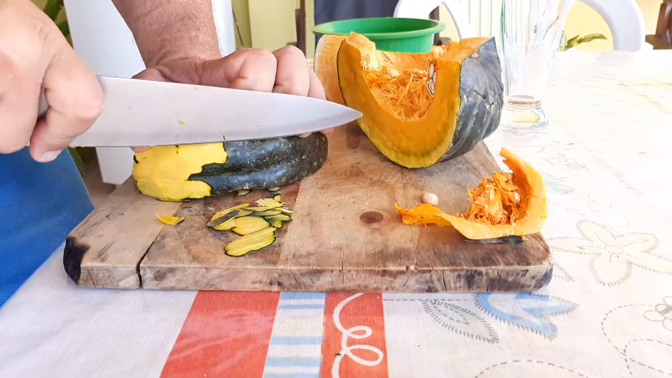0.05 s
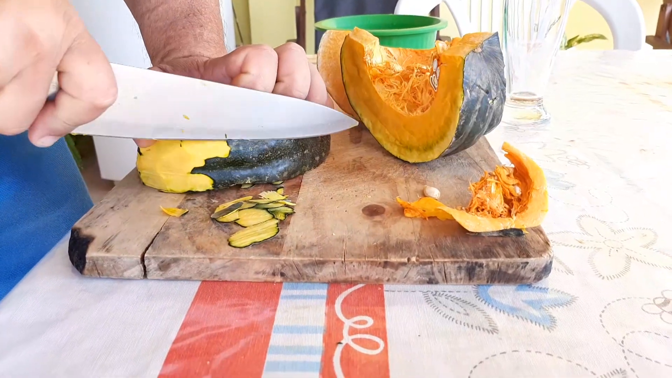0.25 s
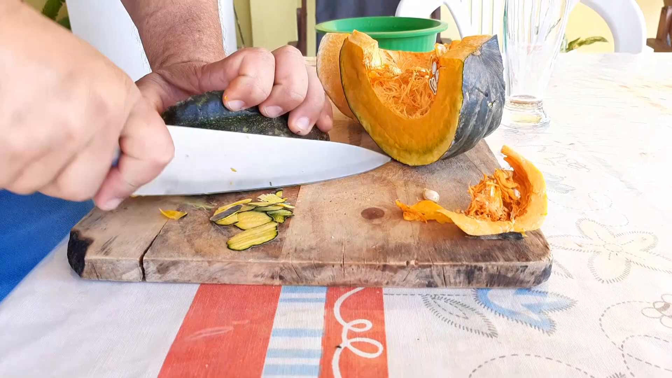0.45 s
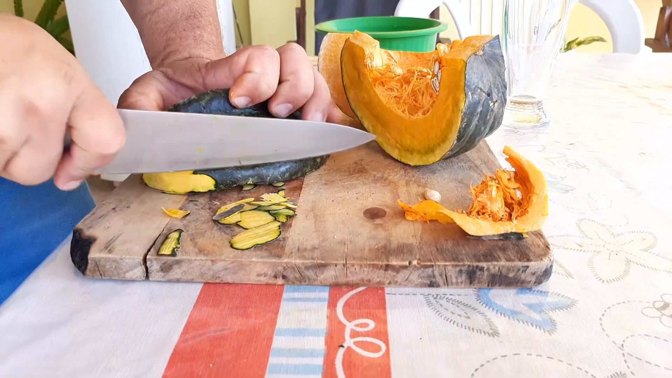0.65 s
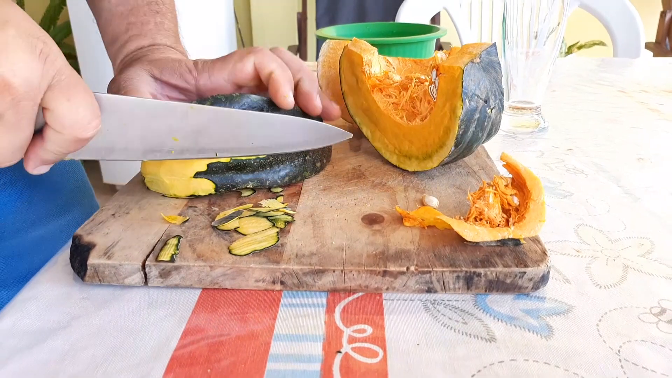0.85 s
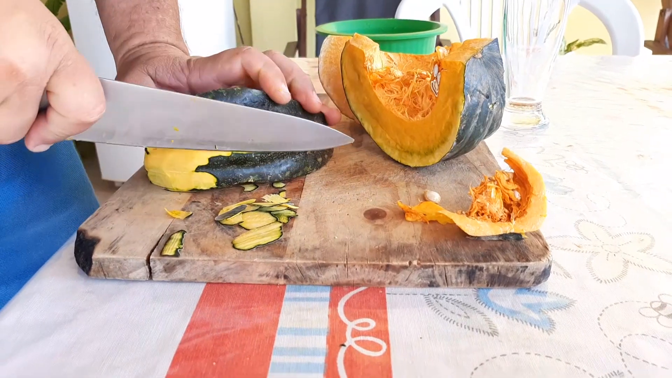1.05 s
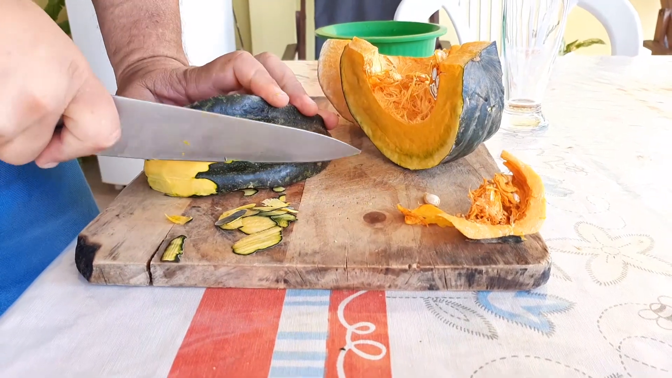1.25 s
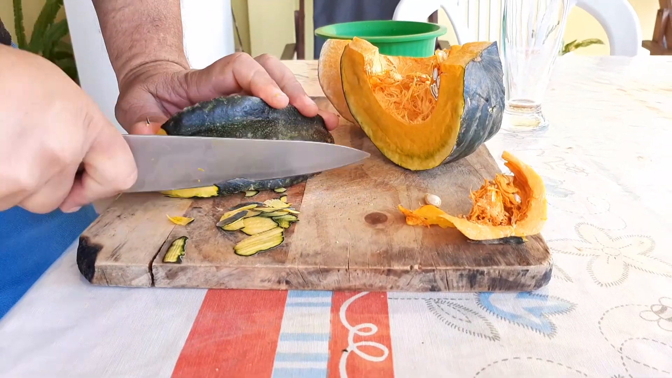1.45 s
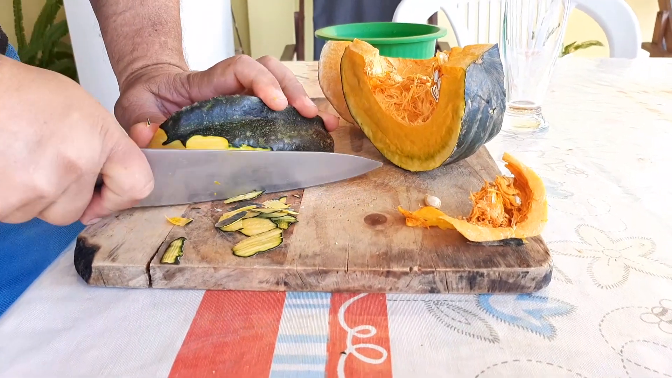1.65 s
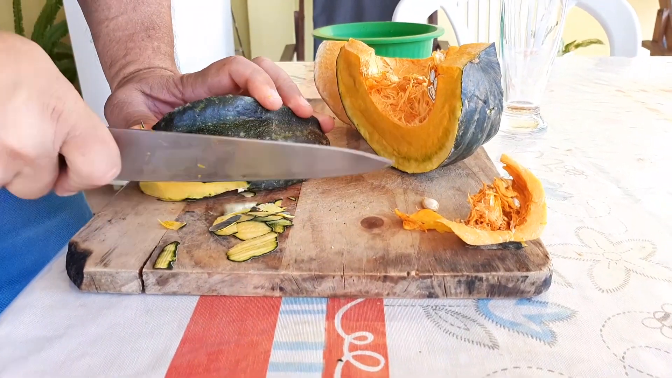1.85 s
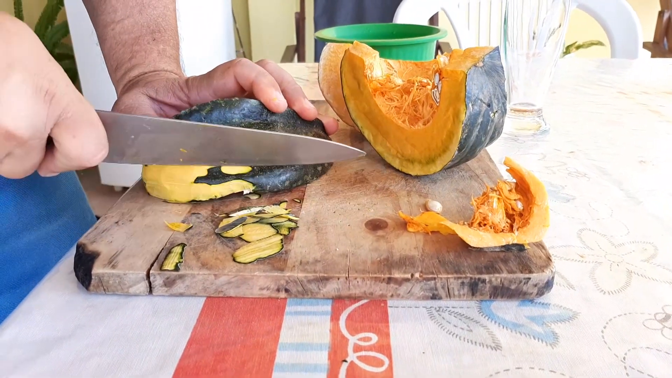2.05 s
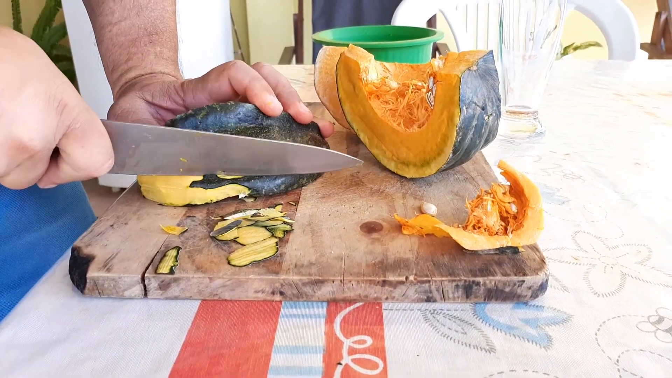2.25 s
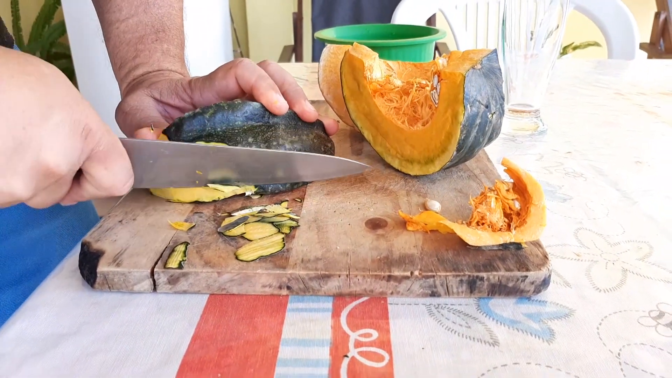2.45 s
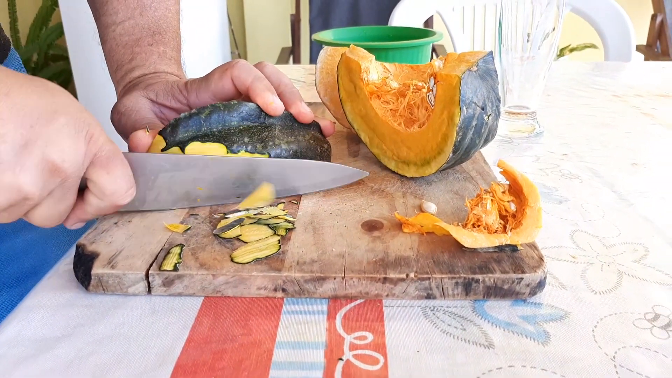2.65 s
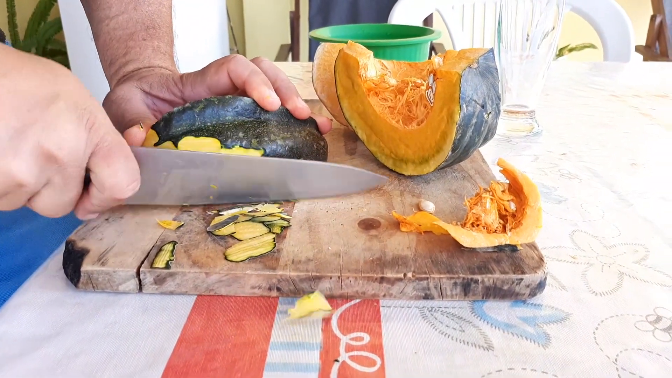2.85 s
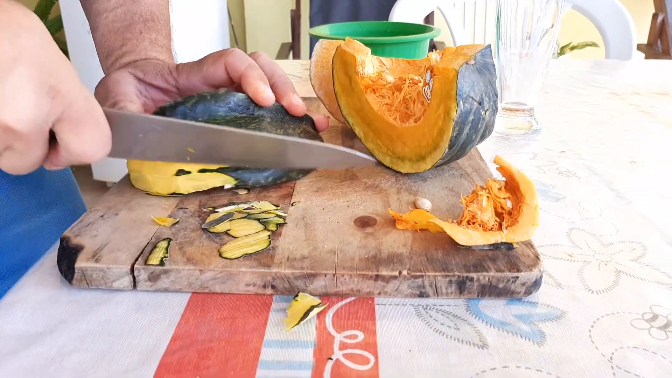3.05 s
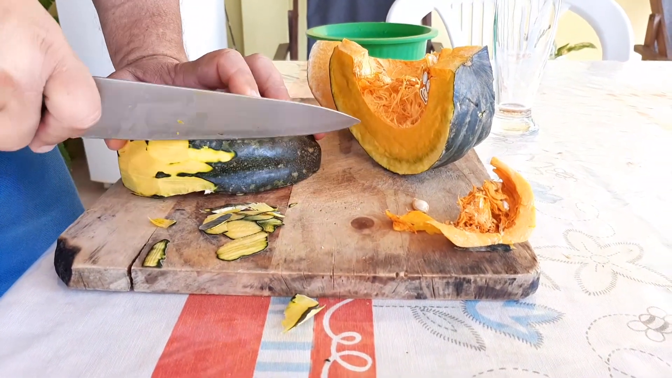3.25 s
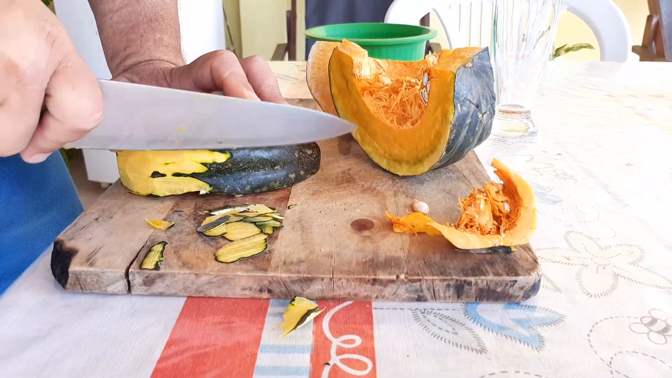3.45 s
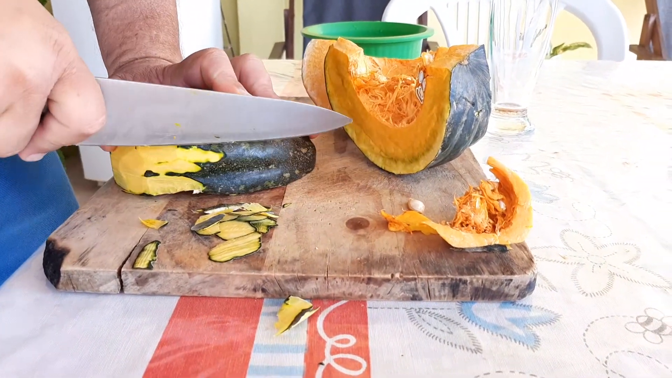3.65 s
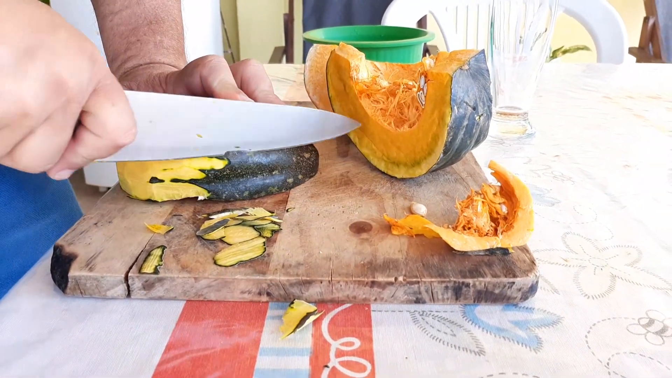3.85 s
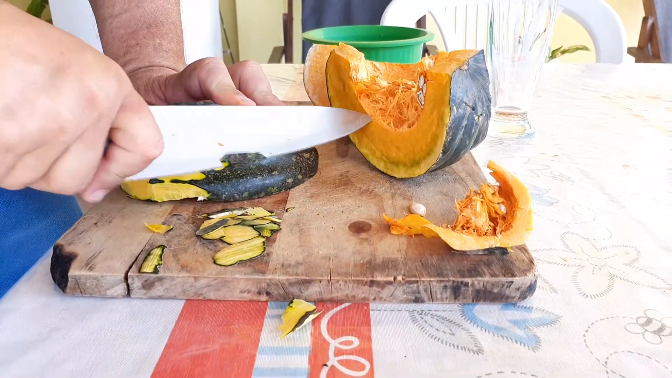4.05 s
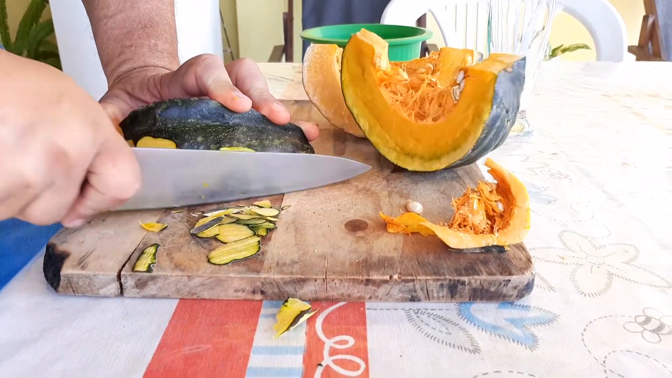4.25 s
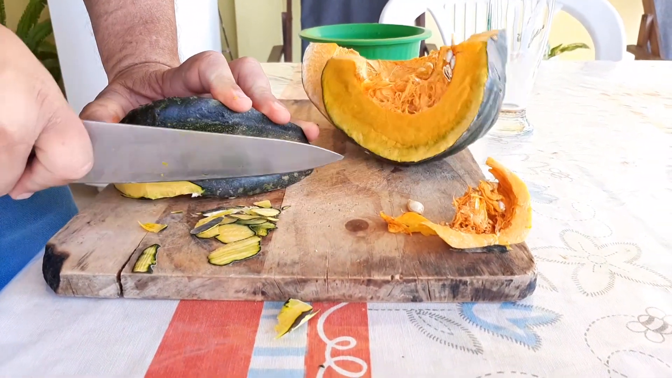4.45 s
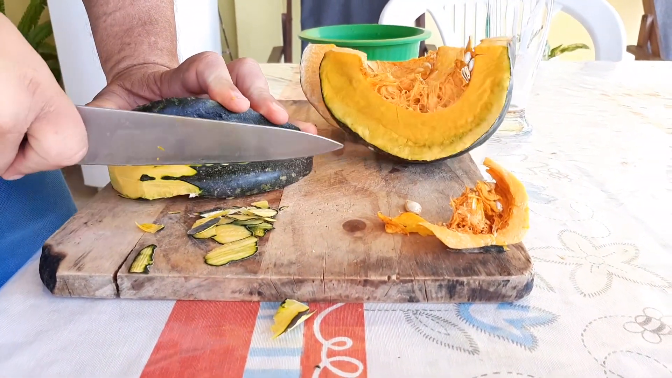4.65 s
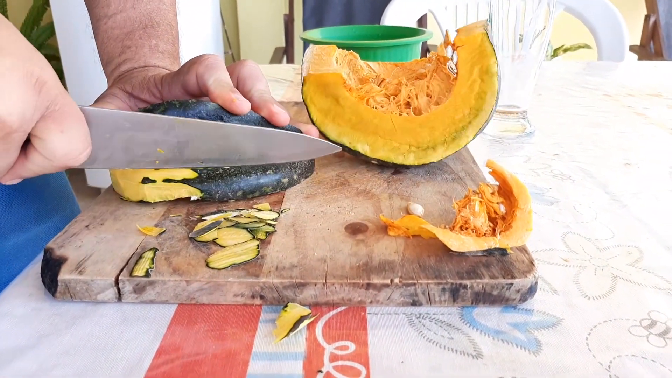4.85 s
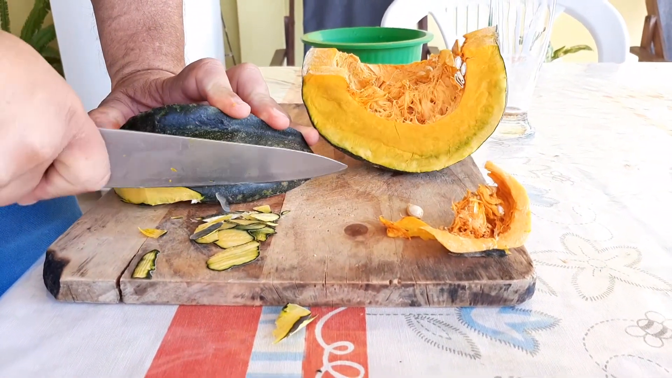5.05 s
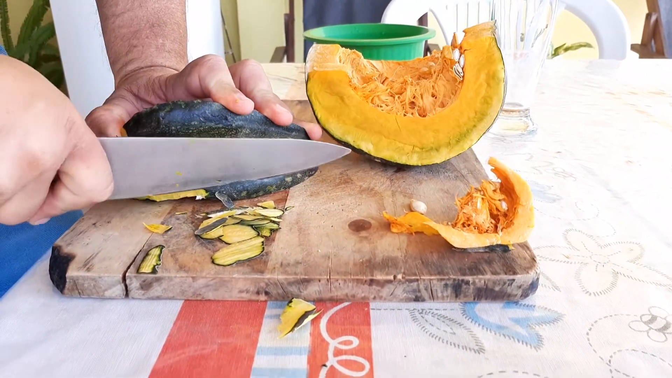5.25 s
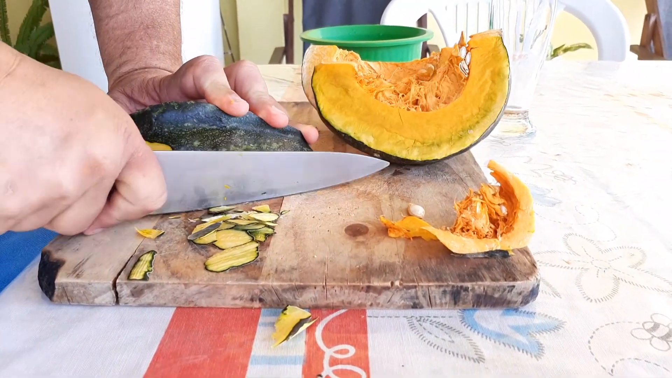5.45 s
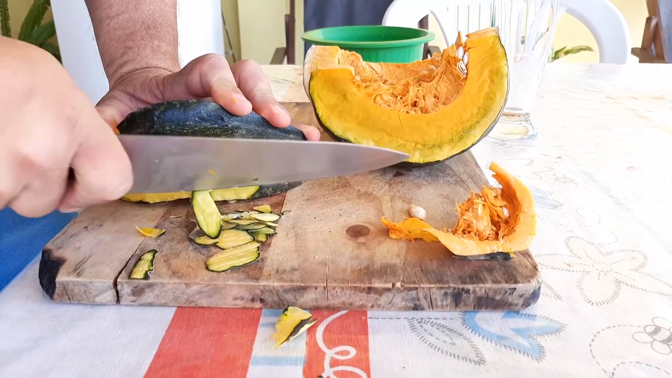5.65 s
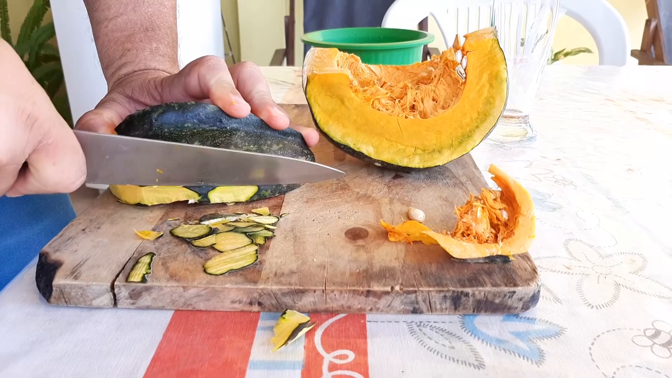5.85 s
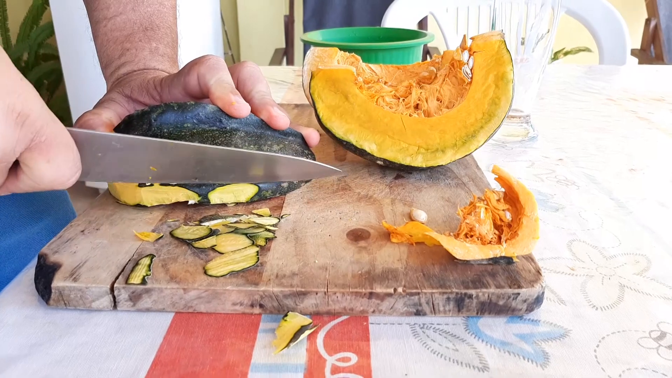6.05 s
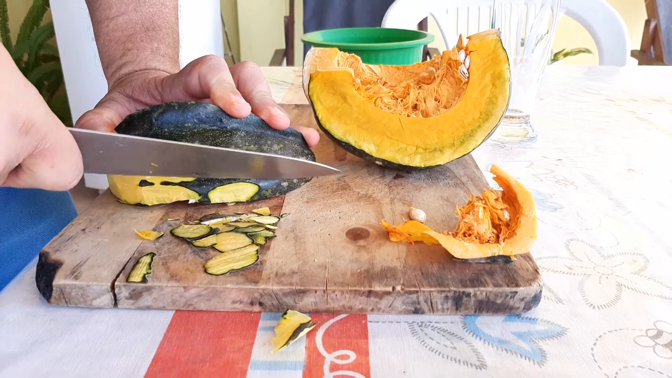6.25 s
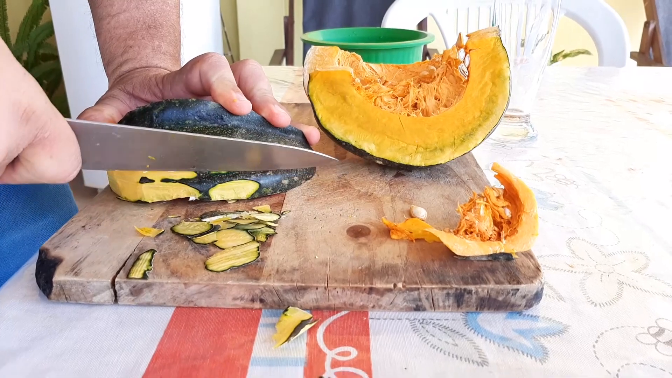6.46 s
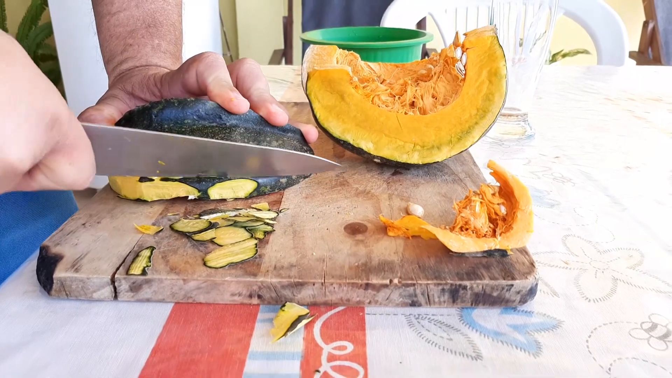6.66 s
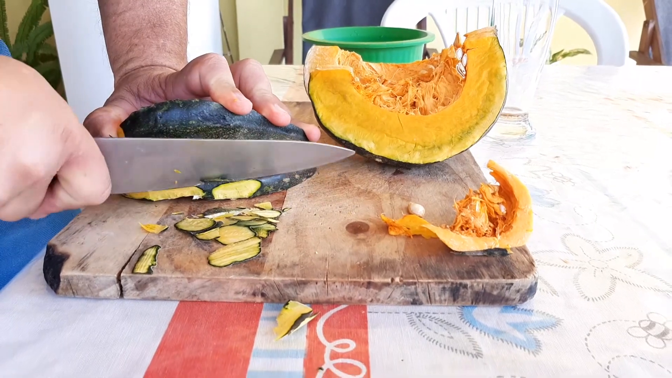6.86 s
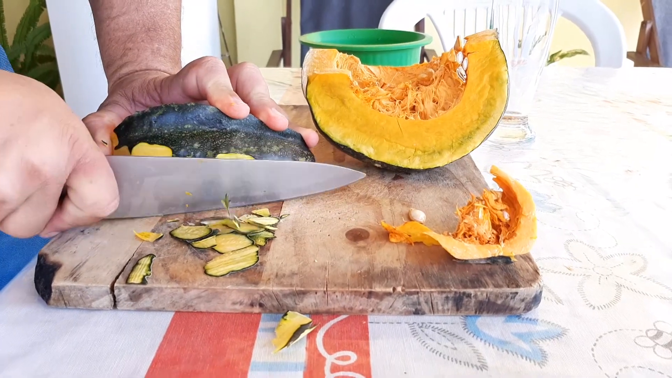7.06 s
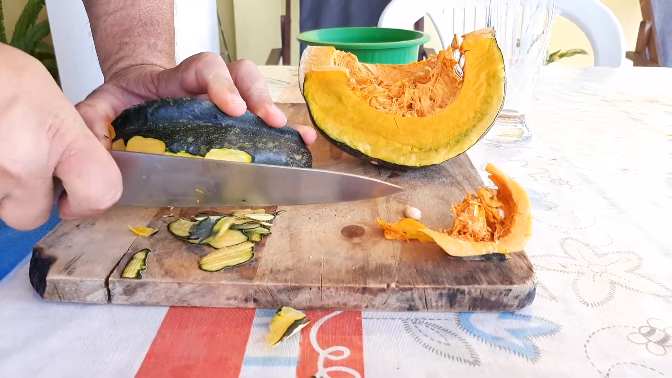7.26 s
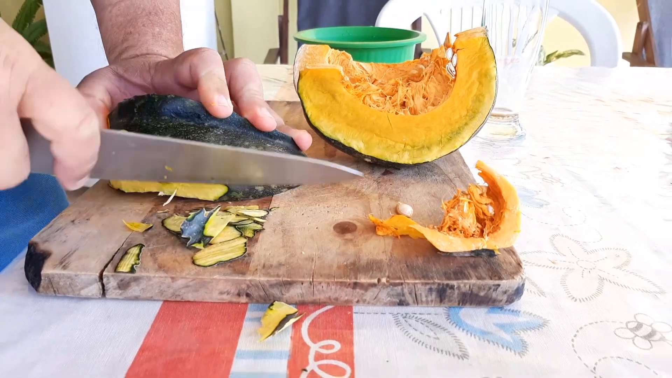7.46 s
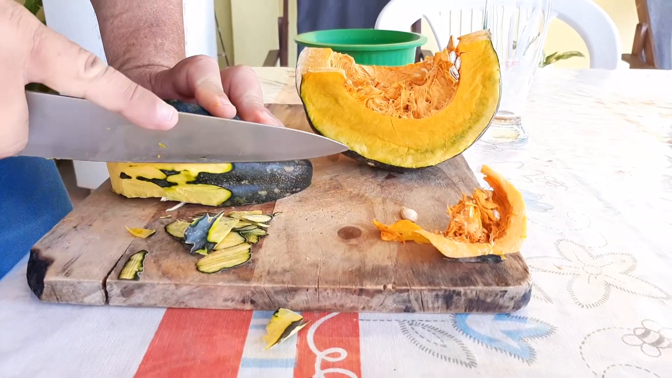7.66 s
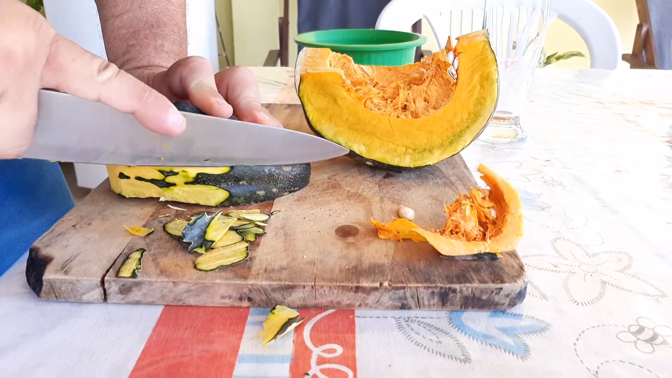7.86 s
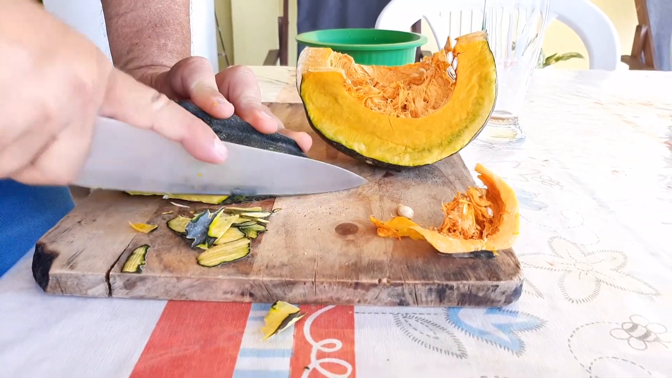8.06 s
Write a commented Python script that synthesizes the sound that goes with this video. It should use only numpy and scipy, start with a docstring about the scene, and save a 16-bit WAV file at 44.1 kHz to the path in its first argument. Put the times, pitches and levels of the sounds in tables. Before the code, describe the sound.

Spaced strokes of a big blade snap crisply through tough rind and clack onto a wooden board, with brief bright room echo and faint rumble.

```python
"""A kitchen knife pares the hard rind off a pumpkin on a wooden board, heard from close by.
Over a rumble, faint hiss and hum, the room first rings faintly from an earlier stroke and the pumpkin rocks.
Then each stroke cracks the rind by stick-slip, in spurts of noise that sound through blade and flesh,
and the edge knocks on the board, whose modes die away while a bare kitchen answers with dense echoes.
Between strokes come light rubs of handling, as fine grains of noise, and nudges rock the hollow pumpkin."""
import sys
import numpy as np
from scipy import signal
from scipy.io import wavfile

SR = 44100
rng = np.random.default_rng(int(sys.argv[2]) if len(sys.argv) > 2 else 0)


def store_wav(level_fs):
    """Save 16-bit WAV to argv[1]."""
    pcm = np.round(np.clip(np.atleast_2d(level_fs), -1, 1) * 32767)
    wavfile.write(sys.argv[1], SR, pcm.T.astype(np.int16))


N = 357633

# the blade is pushed into the rind, where it sticks and slips: (start [s], length [s], number of slips,
# first slip [dB], last slip [dB], blade snap re slip [dB], flesh crunch re slip [dB], relative rocking [dB])
PUSHES = [(0.41, .01, 1, -48.5, -48, -1.5, 2, -49), (.427, 0.027, 3, -43, -45.5, -2, 1, -26.5),
          (1.344, 0.038, 2, -41.5, -41.5, -1.5, -3.5, -45.5), (1.375, 0.04, 3, -39, -43, -4, 1, -20),
          (1.487, .032, 2, -27.5, -32.5, -7.5, -4.5, -47), (1.561, .018, 3, -24, -25.5, 1, -9, -38),
          (2.273, .01, 1, -55, -52, -1.5, 2, -34.5), (2.391, 0.034, 3, -40, -45.5, -5, -0.5, -26),
          (2.424, .056, 4, -30.5, -24.5, -14.5, -12.5, -32),
          (2.653, .016, 3, -23, -31.5, -5.5, -5.5, -36.5), (4.097, 0.0065, 1, -28, -27, -2, -1.5, -21),
          (4.104, 0.027, 4, -44, -36, -1.5, 1, -44.5), (5.331, .036, 3, -31.5, -43.5, -3.5, -6.5, -42),
          (5.378, 0.027, 3, -34, -21, 1, -6, -43.5), (6.686, 0.052, 3, -41, -38, -6.5, -4.5, -34),
          (6.787, .01, 1, -36, -35, -10.5, -12, -31.5), (6.899, 0.054, 5, -37.5, -16.5, -9, -11.5, -44),
          (6.947, 0.063, 9, -25, -26.5, -0.5, -5.5, -24), (8.07, 0.026, 3, -37, -36, -3, -2.5, -30.5)]
# spectrum of the fizz in the air: (frequency [Hz], relative level [dB per Hz])
FIZZ = [(3000, -47), (7000, -26.5), (8600, -20.5), (10500, -8.5), (13000, -2), (14900, -5), (16200, -13.5)]
# spectrum of the snap: (frequency [Hz], relative level [dB per Hz])
SNAP = [(1500, -28), (3000, -11.5), (4200, 1), (5400, 3.5), (6400, -3.5), (7500, -9), (10000, -36.5)]
# spectrum of the crunch of flesh: (frequency [Hz], relative level [dB per Hz])
FLESH = [(150, -17), (300, -4), (550, -7.5), (800, 0), (1000, -6.5), (1250, 3), (2000, -4.5), (2800, -0.5),
         (4000, -15.5), (8000, -43.5)]


def slips(jitter=0.04):
    """Stick-slip friction: each push breaks the rind in a run of slips whose level ramps in dB.

    Rows are (time [s], fizz [dB], snap [dB], crunch [dB]).
    """
    rows = []
    chances = rng.standard_normal((len(PUSHES), 16))
    for push, chance in zip(PUSHES, chances):
        start, length, count, first_db, last_db, snap_db, flesh_db, _ = push
        for k, db in enumerate(np.linspace(first_db, last_db, count)):
            late = jitter * chance[k] if k else 0  # the pace is slightly uneven
            time = start + length * (k + late) / count
            rows.append((time, db, db + snap_db, db + flesh_db))
    return rows


def fractures(length, per_s=4000, spread_db=3.0, likeness=0.94):
    """Brittle fracture as shot noise: cell ruptures of uneven size, strongest as the crack opens."""
    n = max(round(length * SR), 16)
    size = amp(spread_db * np.minimum(rng.exponential(1, n), 4))
    ruptures = (rng.random(n) < per_s / SR) + 0.19  # sparse bursts over a weaker steady noise
    opening = 1 + 1.5 * np.exp(-np.arange(n) / (.002 * SR))
    return pair(rng.standard_normal((2, n)), likeness) * size * ruptures * opening


def rind(cracks, flesh_db=-1.0, linger_db=-9, widest_lag_s=0.00022, balance_db=3.0):
    """Radiation by three paths: each spurt of ruptures sounds in the air, the blade and the flesh."""
    spurt_s, linger_s = .005, .0035
    sounding = (spurt_s + linger_s / 2) * SR  # effective length in samples
    out = np.zeros((2, N))
    colours = [colour(FIZZ), colour(SNAP), colour(FLESH)]
    t = np.arange(SR // 30) / SR
    for (s, fizz, snap, flesh), place in zip(cracks, rng.random(len(cracks))):
        # the blade, damped by the flesh, rings on for only a few milliseconds
        blade = rng.standard_normal((2, len(t))) * np.exp(-t / linger_s)
        blade *= amp(linger_db) / np.linalg.norm(blade[0])
        blade[:, 0] = 1  # the direct sound
        spurt = convolve(fractures(spurt_s), blade)
        spurt = apart(spurt, lag_s=place * widest_lag_s)  # each opens elsewhere along the edge
        for click, db in zip(colours, (fizz, snap, flesh + flesh_db)):
            sound = convolve(spurt, click)
            sound *= np.sqrt(2 * sounding) / np.linalg.norm(sound)
            add(out, s, amp(db) * sides(balance_db) * sound)
    return out


def chops(board_db=1.5, room_db=9, earlier_db=-27, rebound_s=.0014, rebound=0.23, right_pitch=1.2):
    """Impact excitation of modes: the edge strikes the board; returns near sound and room feed."""
    # the blade lands on the board: (time [s], relative blow [dB], nominal contact time [ms],
    # pitch factor of the spot, table thud [dB], relative wood to room [dB], relative steel to room [dB])
    landings = [(.4590, 1, 0.11, 1, -16, 2, -12), (1.583, -1, 0.1, 1.093, -44, 0.5, -10),
                (2.6692, 3.5, .09, 1.08, -41.5, 5, -9), (4.1370, 1.5, 0.062, 1.073, -17.5, 5.5, -4),
                (5.4078, 2, 0.11, 1.025, -49.5, 1, -11), (7.0110, 6.5, 0.2, 0.98, -37.5, 0, -39.5),
                (8.0988, 2, .13, 1, -47.5, 5, -22)]
    # modes of the board at pitch factor 1: (frequency [Hz], relative level [dB], t60 [s])
    board_modes = [(298, -23, 0.049), (593, -20.5, 0.024), (793, -14, 0.019), (1266, -9.5, .017),
                   (1914, -5, 0.013), (2391, -6.5, 0.0068), (3560, -16.5, 0.016), (5000, -11, 0.011),
                   (5960, -24, 0.01)]
    # modes of the table under the board: (frequency [Hz], relative level [dB], t60 [s])
    table_modes = [(48, -19, .09), (90, -2.5, 0.063)]
    # spectrum the wood sends out, at pitch factor 1: (frequency [Hz], relative level [dB per Hz])
    radiated = [(40, -29.5), (100, -9.5), (170, -13), (260, -14.5), (480, -7.5), (650, -12.5), (1120, -0.5),
                (1550, -0.5), (2000, 0.5), (2650, -2), (3150, -16.5), (4500, -28.5), (9000, -43),
                (16000, -40)]
    # spectrum the blade's steel sends out: (frequency [Hz], relative level [dB per Hz])
    steel = [(2200, -21), (3000, -7), (3600, 8.5), (4350, -3.5), (5350, -7), (6500, -14), (8500, -29),
             (15000, -34.5)]
    near, sent = np.zeros((2, 2, N))
    t = np.arange(SR // 200) / SR
    for s, blow_db, contact_ms, pitch, table_db, wood_db, steel_db in landings:
        u = t * 2000 / contact_ms  # the force peaks after half the contact time
        force = u * np.exp(-u)  # a longer contact gives a duller blow
        modes = [ring(board_modes, pitch), ring(board_modes, pitch * right_pitch)]
        board = convolve(modes, force / force.sum())
        board *= amp(blow_db + board_db) * sides(3.5)
        add(near, s, board)
        add(near, s + rebound_s, rebound * board)
        add(near, s, amp(table_db) * sides(7.3) * ring(table_modes, onset_s=.001))
        wood = [(hz * pitch, db) for hz, db in radiated]
        add(sent, s, amp(wood_db + room_db) * colour(wood))
        add(sent, s, amp(steel_db + room_db) * colour(steel))
    add(sent, 0, amp(earlier_db) * colour(radiated))  # the kitchen still rings from an earlier stroke
    return near, sent


def jolts(cracks, rock_db=2, slip_knock_db=-24, knock_follow=.25):
    """Damped resonance: pushes rock the soft pumpkin, slips make it ring dully, nudges do both."""
    # the pumpkin is nudged against the board: (time [s], relative rocking [dB], hollow knock [dB])
    nudges = [(0.165, -69, -49), (3.093, -64.5, -58.5), (3.538, -49, -40.5), (4.499, -43, -40.5),
              (5.046, -27.5, -34.5), (5.903, -33, -46), (7.662, -41, -52.5)]
    # modes of the pumpkin rocking on the board: (nominal frequency [Hz], relative level [dB], t60 [s])
    rocking = [(65, -16, 0.3), (100, 0, 0.06)]
    # modes of the hollow pumpkin: (nominal frequency [Hz], relative level [dB], t60 [s])
    hollow = [(162, -11, 0.092), (242, -2.5, 0.074), (328, -8.5, 0.08), (470, -11, 0.037), (563, -9, .02),
              (797, -4.5, 0.036), (1210, -11.5, 0.073)]
    out = np.zeros((2, N))
    rocks = [(push[0], push[-1]) for push in PUSHES]
    rocks += [(s, db) for s, db, _ in nudges]
    # the hollow knock of a slip grows only slowly with its crunch
    knocks = [(s, slip_knock_db + knock_follow * crunch) for s, _, _, crunch in cracks]
    knocks += [(s, db) for s, _, db in nudges]
    for s, db in rocks:
        rock = ring(rocking, rng.uniform(.94, 1.06), onset_s=0.0054)
        add(out, s, amp(db + rock_db) * sides(9) * rock)
    for s, db in knocks:
        knock = ring(hollow, rng.uniform(.94, 1.06), onset_s=0.0022)
        add(out, s, amp(db) * sides(3) * knock)
    return low_cut(out, hz=55)


def rubs():
    """Sliding friction: light rubs of handling as fine, fairly even grains that swell and fade."""
    # light rubs and one short tick as rind, peel or hand are handled:
    # (time [s], length [s], relative level [dB])
    handling = [(1.24, 0.065, -72), (2.28, 0.034, -67.5), (2.886, 0.055, -66), (3.103, 0.071, -70.5),
                (3.385, 0.12, -67.5), (3.566, 0.052, -67.5), (4.242, 0.069, -60), (5.033, 0.019, -56.5),
                (6.204, 0.083, -68.5), (7.189, 0.0043, -49.5), (7.211, 0.036, -64)]
    out = np.zeros((2, N))
    for s, length, db in handling:
        for points, part_db in ((FIZZ, -2), (SNAP, -1), (FLESH, 2)):
            grains = fractures(length, per_s=10000, spread_db=1.5, likeness=0.34)
            grains = grains * signal.windows.tukey(grains.shape[1], .9)
            rub = convolve(grains / rms(grains), colour(points))
            add(out, s, amp(db + part_db) * sides(3) * rub)
    return out


def kitchen(x, gap_s=.009, build_s=0.0018, wall_s=0.014, wall=0.25, bass_hz=950, bass_likeness=0.88):
    """Reverberation: dense reflections build after a gap and die band by band, with one wall echo."""
    # the kitchen's decay: (frequency [Hz], t60 [s])
    decay = [(80, 0.76), (250, .66), (600, 0.63), (1300, 0.6), (2600, 0.56), (5000, 0.48), (8000, 0.43),
             (15000, 0.25)]
    t = np.arange(SR) / SR
    taps = rng.choice([-1., 1.], (2, SR))
    hz, when, bands = signal.stft(taps, SR, nperseg=256)
    # long waves reach both sides alike
    bands = pair(bands, bass_likeness / (1 + (hz[:, None] / bass_hz) ** 4))
    dying = amp(-60 * when / read(decay, hz)[:, None])
    tail = signal.istft(bands * dying, SR, nperseg=256)[1][:, :SR]
    tail *= .5 + .5 * np.tanh((t - gap_s) / build_s)
    tail /= np.linalg.norm(tail, axis=1, keepdims=True)
    tail[:, round(wall_s * SR)] += wall
    return convolve(x, tail)[:, :N] * sides(1)


def background(rumble_db=-2, hiss_db=-35.0, hiss_follow=0.61, waver_db=2, hum_drift=0.12, hum_waver_db=3):
    """Stationary noise under slow modulation: a swelling rumble, faint hiss and a wavering hum."""
    # swell of the background: (time [s], relative level [dB])
    swells = [(0, -56), (1.15, -62.5), (1.85, -55), (2.15, -62.5), (2.55, -56.5), (3.2, -59), (3.9, -54),
              (4.75, -62), (5.8, -53), (6.5, -55), (7.3, -44), (7.65, -55), (8.1, -55)]
    # spectrum of the rumble: (frequency [Hz], relative level [dB per Hz])
    rumble_points = [(20, -27.5), (40, -19), (65, 4.5), (110, -3.5), (160, -11.5), (260, -14), (400, -20.5),
                     (750, -21.5), (1200, -32.5), (2500, -41.5), (6000, -62.5)]
    # spectrum of the hiss: (frequency [Hz], relative level [dB per Hz])
    hiss_points = [(100, -7), (1000, -6.5), (2500, 1), (3500, -2.5), (6500, -1.5), (7700, -5.5),
                   (8600, -11.5), (12000, -8), (16000, -18)]
    # a steady appliance's tones: (mean frequency [Hz], level before wavering [dB])
    tones = [(118.4, -65), (258, -79.5), (533, -85), (738, -86)]
    t, frames = np.arange(N) / SR, np.arange(0, N + 256, 256) / SR
    swell, wander, throb = (np.interp(t, frames, waver(frames)) for _ in range(3))
    level_db = np.interp(t, *np.transpose(swells))
    rumble = convolve(pair(rng.standard_normal((2, N)), 0.2), colour(rumble_points, size=8192))
    rumble = rumble[:, :N] * sides(6.7)
    rumble = low_cut(rumble * amp(level_db + rumble_db + waver_db * swell), hz=35)
    hiss = convolve(pair(rng.standard_normal((2, N)), 0.025), colour(hiss_points))
    hiss = hiss[:, :N] * sides(1.5)
    hiss *= amp(hiss_follow * level_db + hiss_db)  # swells less than the rumble
    hum = np.zeros(N)
    for hz, db in tones:
        cycles = hz * t + hum_drift * wander + rng.random()
        hum += amp(db) * np.sqrt(2) * np.sin(2 * np.pi * cycles)
    return rumble + hiss + amp(hum_waver_db * throb) * hum * sides(2.1)


def ring(modes, pitch=1, onset_s=1e-5):
    """Modal decay: dying sines of a struck body; neighbouring modes push the air in opposite senses."""
    t = np.arange(SR // 4) / SR
    waves = np.zeros(len(t))
    for k, (hz, db, t60) in enumerate(modes):
        waves += (-1) ** k * amp(db - 60 * t / t60) * np.sin(2 * np.pi * hz * pitch * t)
    return waves * (1 - np.exp(-t / onset_s))


def colour(points, size=4096):
    """Minimum phase: a causal click of unit energy whose spectrum has this shape."""
    hz = abs(np.fft.fftfreq(size, 1 / SR))
    log_gain = np.log(amp(read(points, hz)))
    click = np.fft.ifft(np.exp(np.conj(signal.hilbert(log_gain)))).real[:size // 2]
    return click / np.linalg.norm(click)


def waver(t, slow_hz=1.7, fast_hz=12, count=24):
    """Random modulation: sines of chance phase, weaker towards the fast end, with rms 1."""
    drift = np.zeros(len(t))
    for hz in np.geomspace(slow_hz, fast_hz, count):
        drift += np.sin(2 * np.pi * (hz * t + rng.random())) / np.sqrt(hz)
    return drift / rms(drift)


def pair(two, likeness):
    """Partial coherence: makes two unrelated signals partly alike."""
    c = np.clip(likeness, 0, 1)
    return np.array([two[0], c * two[0] + np.sqrt(1 - c * c) * two[1]])


def sides(balance_db):
    """Level difference between the sides: left and right gains at constant power."""
    gains = amp(np.array([[balance_db], [-balance_db]]) / 2)
    return gains / rms(gains)


def apart(two, lag_s):
    """Path difference: the sound reaches the right side a little later."""
    return np.array([two[0], np.roll(two[1], round(lag_s * SR))])


def low_cut(x, hz):
    """Inefficient radiation of long waves: a second-order high-pass removes deep bass."""
    return signal.sosfilt(signal.butter(2, hz, "highpass", fs=SR, output="sos"), x)


def convolve(x, response):
    """Linear superposition: convolution along time, channel by channel."""
    return signal.fftconvolve(np.atleast_2d(x), np.atleast_2d(response), axes=1)


def add(mix, s, sound):
    """Superposition: adds a sound to the stereo mix at time s in seconds."""
    part = mix[:, round(s * SR):][:, :sound.shape[-1]]
    part += sound[..., :part.shape[1]]


def read(points, hz):
    """Logarithmic pitch scale: a table's value at hz, interpolated over log frequency."""
    f, value = np.transpose(points)
    return np.interp(np.log(hz + 1), np.log(f + 1), value)


def amp(db):
    """Logarithmic level: decibels to amplitude gain."""
    return 10 ** (np.asarray(db) / 20)


def rms(x):
    """Effective value: root mean square."""
    return np.sqrt(np.mean(x ** 2) + 1e-20)


def scene(rind_wet_db=-13, jolt_wet_db=-12, beam_hz=7000):
    """Direct and reverberant fields superposed: near sounds, the room's answer and the background."""
    knocks, sent = chops()
    cracks = slips()
    cutting = rind(cracks) + rubs()
    bumps = jolts(cracks)
    # little of the highest fizz reaches the walls
    spread = signal.lfilter(*signal.butter(1, beam_hz, fs=SR), cutting)
    sent = sent + amp(rind_wet_db) * spread + amp(jolt_wet_db) * bumps
    return knocks + cutting + bumps + kitchen(sent) + background()


def record(dry, edge_hz=16000):
    """Limited range and band: peaks beyond full scale clip, then a linear-phase low-pass acts."""
    low_pass = signal.firwin(255, edge_hz, window=("kaiser", 8), fs=SR)
    return signal.oaconvolve(np.clip(dry, -1, 1), low_pass[None], "same")


dry = scene()
out = record(dry)
store_wav(out)
```